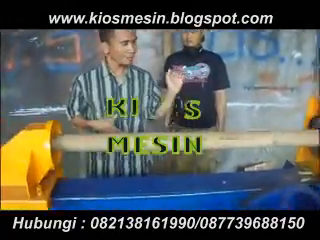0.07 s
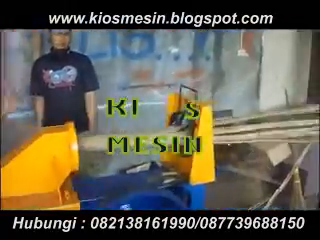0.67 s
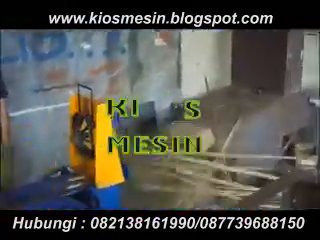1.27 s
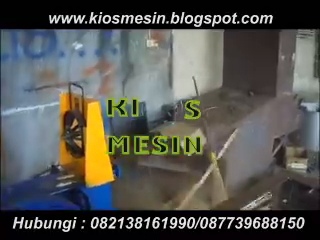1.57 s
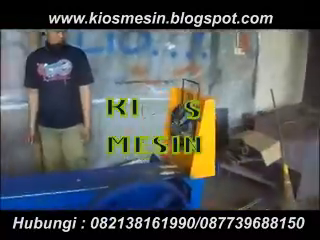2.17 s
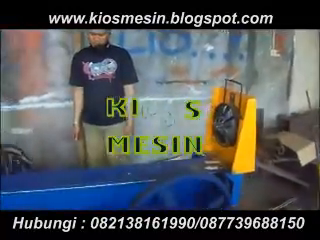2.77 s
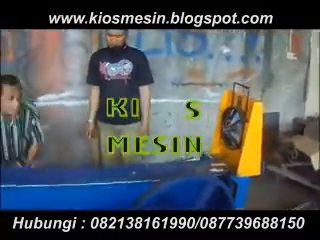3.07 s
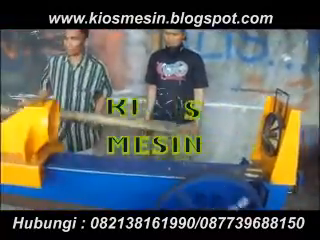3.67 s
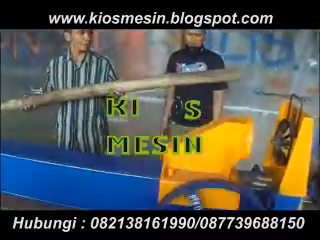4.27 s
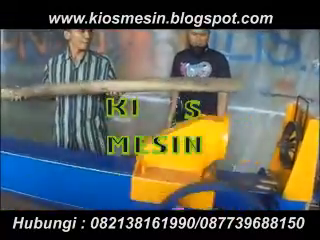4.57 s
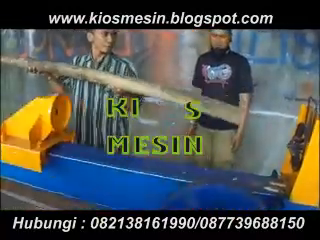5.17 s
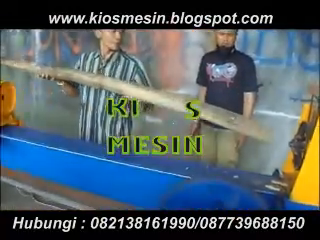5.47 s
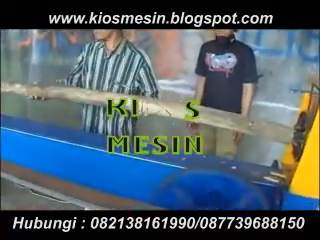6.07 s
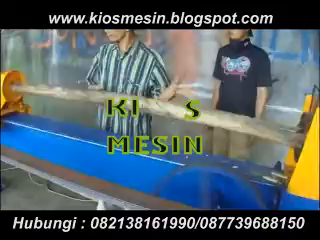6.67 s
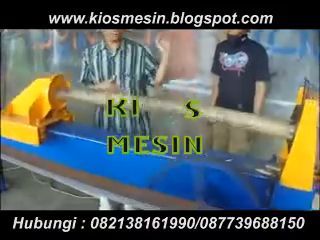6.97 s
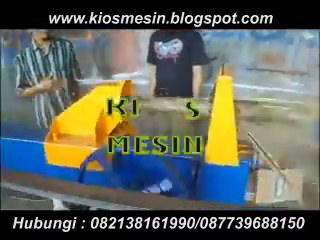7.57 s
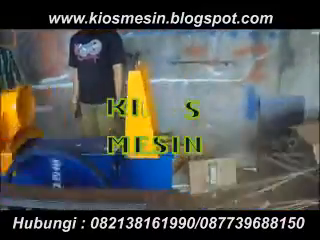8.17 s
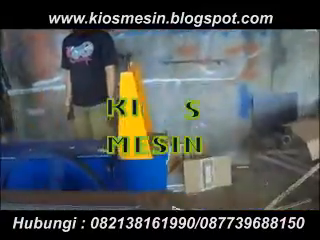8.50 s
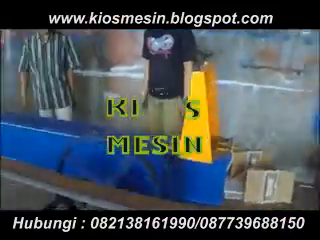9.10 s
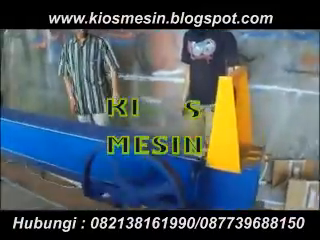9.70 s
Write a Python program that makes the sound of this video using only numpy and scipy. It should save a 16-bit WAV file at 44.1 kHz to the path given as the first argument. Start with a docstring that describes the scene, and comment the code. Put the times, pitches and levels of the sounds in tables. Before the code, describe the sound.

Sharp bamboo cracks with a short hollow ring open the scene, followed by tearing fibres and tumbling strips. The splitting machine's chain rattle and steel drone swell over a faint motor hum, and its howling, squeaking carriage slams three times. Then another pole splits with more cracks and clatter, and everything stops abruptly. Hard workshop walls give the cracks a short reverb, and the narrow-band mono microphone distorts slightly on the peaks.

```python
"""In a workshop a bamboo splitter runs: poles are driven through the star blade with sharp cracks and a
hollow ring, fibres tear and the strips clatter to the floor. The ram carriage crashes at the ends of its
travel; its rollers set the bed howling, dry steel squeaks and the rails whine. A drive chain rattles along
the droning steel frame over a motor's hum. The loudest blows overload a narrow-band microphone."""
import sys
import numpy as np
from scipy import signal
from scipy.fft import rfft, irfft, next_fast_len
from scipy.io import wavfile
from scipy.ndimage import uniform_filter1d, map_coordinates

SR = 44100
rng = np.random.default_rng(int(sys.argv[2]) if len(sys.argv) > 2 else 0)


def generate_wav(sig):
    """Save sig (samples, or channels by samples) to the path in sys.argv[1] as 16-bit PCM at SR."""
    pcm = np.round(np.clip(np.atleast_2d(sig).T, -1, 1) * 32767).astype(np.int16)
    wavfile.write(sys.argv[1], SR, pcm)


N = 433944
TIME = np.arange(N) / SR

# hard blows on the pole: t/s, level/dB, t60/s, second snap after/s, tube f/Hz, ring/dB, thump/dB
BLOWS = [(0.252, -21.5, 0.04, 0.0071, 596, -19, -42), (0.352, -5, 0.09, 0.019, 435, -15.5, -11.5),
         (0.7389, -7, 0.16, 0.021, 1370, -14, -33), (1.0789, -6, 0.046, 0.0256, 1123, -7.5, -37),
         (6.6565, -7, 0.076, 0.012, 533, -13, -41), (6.9527, -7, 0.054, 0.017, 910, -12.5, -30.5),
         (7.609, -9, 0.096, 0.016, 1275, -23, -51), (7.893, -12, 0.031, 0.01, 1083, -15, -42)]
# carriage slams: t/s, level/dB, rise/s, hold/s, clash level/dB, clash hold/s
CRASHES = [(2.807, -4.5, 0.03, 0.083, -11, 0.06), (4.496, -3.5, 0.007, 0.082, -7, 0.03),
           (6.185, -5.5, 0.007, 0.077, -10, 0.055)]
# resonances of the frame's panels: f/Hz, width/Hz, level/dB
PANELS = [(297.5, 16, 1.5), (349.4, 21, 2.5), (481, 37, 1), (573, 43, 4), (659.4, 24, 7), (754, 22, -1.5),
          (883.6, 32, 2), (1066, 20, 3), (1346, 57, -3), (1753, 33, -2.5), (2197, 28, -5.5),
          (2565, 12, 0.5), (2816, 20, -5.5)]
# spectrum of rattling steel: f/Hz, level/dB
RATTLE = [(700, -26), (1400, 2.5), (2000, -2.5), (3100, -0.5), (4000, -6), (4900, -11), (5400, -18),
          (6300, -22.5), (7500, -37), (9000, -57)]


def amp(db):
    """Decibels to gain."""
    return 10 ** (np.asarray(db) / 20)


def unit(x):
    """Scale to rms 1."""
    return x / np.sqrt(np.mean(x ** 2) + 1e-20)


def along(points, hz):
    """Read (f/Hz, value) points on a log frequency axis."""
    f, values = np.transpose(points)
    return np.interp(np.log(hz + 1), np.log(f), values)


def wobble(rate):
    """A smooth random curve, rate knots a second."""
    return map_coordinates(rng.standard_normal(int(N * rate / SR) + 4), [TIME * rate])


def filtered(x, response):
    """EQ x with a gain that is a function of frequency."""
    size = next_fast_len(len(x) + SR // 4)
    return irfft(rfft(x, size) * response(np.fft.rfftfreq(size, 1 / SR)), size)[:len(x)]


def coloured(x, spectrum, tilt_db=0):
    """Shape x with a spectrum, tilted by tilt_db per octave, at rms 1."""
    return unit(filtered(x, lambda f: amp(along(spectrum, f) + tilt_db * np.log2(np.clip(f, 300, 6000)))))


def ringing(x, modes):
    """Play x through (f/Hz, width/Hz, level/dB) resonances of alternating polarity, at rms 1."""
    def response(f):
        return sum((-1) ** k * amp(db) * 1j * f * width / (hz * hz - f * f + 1j * f * width)
                   for k, (hz, width, db) in enumerate(modes))
    return unit(filtered(x, response))


def impacts(rate, spread_db, t60):
    """Random contacts of uneven size, rate a second, each a tiny noise burst that dies in t60."""
    power = (rng.random(N) < rate / SR) * amp(spread_db * rng.random(N)) ** 2
    energy = signal.lfilter([1], [1, -amp(-60 / (t60 * SR)) ** 2], power)
    return unit(np.sqrt(energy) * rng.standard_normal(N))


def bursts(rows, t60):
    """Envelope of bursts that rise, hold and die away; the hold counts from the onset."""
    return sum(amp(db - 60 * np.maximum(TIME - s - hold, 0) / t60) * np.clip((TIME - s) / rise, 0, 1)
               for s, db, rise, hold in rows)


def swells(rows, idle_db, t60):
    """Envelope that builds over each stroke and sinks back to idling."""
    strokes = [amp(db - 60 * np.maximum(TIME - s - length, 0) / t60)
               * np.clip((TIME - s) / length, 0, 1) ** build for s, length, db, build in rows]
    return np.sqrt(amp(idle_db) ** 2 + np.sum(np.square(strokes), axis=0))


def cracks(snap_db=-7, snap_t60=0.017, second_db=-7, second_t60=0.13):
    """Each break is a hard snap with a short splintering tail; a hard blow breaks twice."""
    # spectrum of a struck pole: f/Hz, level/dB
    cane = [(60, -28.5), (220, -8.5), (400, -0.5), (700, -8), (1100, 4), (1700, 0), (2500, -2.5),
            (3800, -5.5), (5200, -12), (6500, -29), (8000, -42.5)]
    # loose splinters snap and tick, and a sound already dying away as it begins: t/s, level/dB, tilt/(dB per
    # octave), t60/s
    splinters = [(0.001, -11.5, 0, 0.24), (0.382, -9.5, 13.5, 0.024), (0.716, -21, 9, 0.086),
                 (1.569, -19.5, 4, 0.054), (1.6237, -20, 5.5, 0.11), (2.037, -14.5, 9, 0.025),
                 (3.3947, -19.5, -4, 0.035), (6.9104, -16.5, 2.5, 0.044), (6.9325, -21.5, 9, 0.034),
                 (7.135, -23, 0.5, 0.27), (7.257, -20, 4, 0.032), (7.4253, -15.5, 1, 0.038),
                 (7.5705, -18, 4.5, 0.04), (7.7807, -12, 5, 0.013), (8.245, -20, -5.5, 0.028),
                 (8.268, -22, 3, 0.029), (8.508, -18.5, 9, 0.19)]
    out, t = np.zeros(N), np.arange(SR // 3) / SR
    first = [(s, db, 0, t60) for s, db, t60, *_ in BLOWS]
    second = [(s + after, db + second_db, 0, second_t60) for s, db, _, after, *_ in BLOWS]
    for s, db, tilt_db, t60 in first + second + splinters:
        envelope = amp(db) * (amp(-60 * t / t60) + amp(snap_db - 60 * t / snap_t60))
        out[round(s * SR):][:len(t)] += envelope * coloured(rng.standard_normal(len(t)), cane, tilt_db)
    return out


def tube_ring():
    """The hollow cane rings briefly, at the pitch of the piece struck."""
    # modes of the tube: multiple of its pitch, level/dB, t60/s
    modes = [(1, 1.5, 0.086), (1.4, -2.5, 0.064), (1.85, -6.5, 0.06)]
    out, t = np.zeros(N), np.arange(SR // 3) / SR
    for s, *_, hz, ring_db, _ in BLOWS:
        for multiple, db, t60 in modes:
            envelope = amp(ring_db + db - 60 * t / t60)
            out[round(s * SR):][:len(t)] += envelope * np.sin(2 * np.pi * hz * multiple * t)
    return out


def thumps(centre_hz=80, t60=0.046):
    """Each hard blow jolts the frame: a low, dry thump at a random pitch."""
    out, t = np.zeros(N), np.arange(SR // 4) / SR
    for s, *_, db in BLOWS:
        hz = centre_hz * amp(rng.normal(0, 3.7))
        out[round(s * SR):][:len(t)] += amp(db - 60 * t / t60) * np.sin(2 * np.pi * hz * t)
    return out


def tearing():
    """Fibres crackle as they tear and scrape along the blade."""
    # tears: t/s, level/dB, rise/s, hold/s
    tears = [(0.39, -32.5, 0.01, 0.11), (0.745, -18, 0.005, 0.013), (1.33, -31.5, 0.014, 0.05),
             (1.56, -26, 0.014, 0.13), (3.385, -32, 0.008, 0.027), (6.8, -29.5, 0.06, 0.2),
             (7.255, -19.5, 0.03, 0.061), (7.43, -24.5, 0.022, 0.14), (7.615, -18.5, 0.005, 0.02),
             (7.895, -21, 0.006, 0.048), (8.47, -25.5, 0.016, 0.036)]
    # spectrum of snapping fibres: f/Hz, level/dB
    fibres = [(200, -14.5), (700, -0.5), (1400, 0.5), (3200, 2.5), (4500, -1), (5500, -11.5), (6500, -17),
              (8000, -35.5)]
    return bursts(tears, t60=0.45) * coloured(impacts(rate=1000, spread_db=6, t60=0.016), fibres)


def falling_strips(ring_db=-7):
    """The freed strips tumble on each other and ring."""
    # pole and strips clatter down: t/s, level/dB, rise/s, hold/s
    falls = [(1.085, -18, 0.0062, 0.014), (1.13, -18.5, 0.015, 0.1), (6.665, -24, 0.0046, 0.17),
             (7.955, -12.5, 0.017, 0.031)]
    # spectrum of the heap: f/Hz, level/dB
    heap = [(25, -32), (60, -17.5), (120, -17.5), (220, -5), (600, 2.5), (1200, 0), (2000, -3.5),
            (3000, -2.5), (4500, -14.5), (6500, -29.5), (8000, -48.5)]
    # resonances of loose strips: f/Hz, width/Hz, level/dB
    modes = [(560, 56, 1.5), (1090, 50, -1.5), (1300, 77, -5)]
    clatter = coloured(impacts(rate=600, spread_db=4, t60=0.04), heap)
    ring = ringing(impacts(rate=600, spread_db=4, t60=0.04), modes)
    return bursts(falls, t60=0.58) * unit(clatter + amp(ring_db) * ring)


def crashes(panels_db=-4, lead_s=0.055, lead_db=-16, clash_slower=2.2, steel_t60=0.22):
    """The loose carriage rattles, then hammers the frame in a dense volley with a bright steel clash."""
    # spectrum of the slam: f/Hz, level/dB
    slam = [(25, -11), (60, -11.5), (130, -6.5), (200, -4), (330, -2.5), (650, 0.5), (1200, 0), (2000, -4),
            (3000, -4.5), (4500, -13), (6300, -30.5), (7500, -42.5), (9000, -83)]
    lead = bursts([(s - lead_s, db + lead_db, lead_s / 2, lead_s) for s, db, *_ in CRASHES], steel_t60)
    volley = bursts([row[:4] for row in CRASHES], t60=0.38)
    clash = bursts([(s, db, clash_slower * rise, hold) for s, _, rise, _, db, hold in CRASHES], steel_t60)
    hammering = coloured(impacts(rate=1000, spread_db=3, t60=0.035), slam)
    panels = ringing(impacts(rate=1000, spread_db=3, t60=0.035), PANELS)
    body = unit(hammering + amp(panels_db) * panels)
    steel = impacts(rate=600, spread_db=6.5, t60=0.012)
    return lead * coloured(steel, RATTLE) + volley * body + clash * coloured(steel, RATTLE, tilt_db=3)


def chain(panels_db=-4.5, uneven_db=0.38):
    """Links knock along the frame, whose panels drone, and chatter on the sprockets."""
    # the chain swells as it drags the carriage; a build under 1 swells early, over 1 late:
    # t/s, length/s, drone level/dB, rattle level/dB, drone build, rattle build
    strokes = [(0.8, 0.56, -31, -27.5, 0.5, 0.6), (1.75, 1.24, -19.5, -28.5, 0.36, 0.14),
               (3.097, 1.303, -17.5, -20.5, 1.6, 1.1), (4.908, 1.275, -17, -23.5, 0.62, 0.33),
               (7.15, 0.98, -28, -29, 0.36, 0.66), (8.26, 0.55, -23.5, -26, 0.92, 0.44)]
    # spectrum of the droning frame: f/Hz, level/dB
    frame = [(18, -60.5), (30, -33), (92, -11.5), (124, -18), (287, -2.5), (402, -7.5), (475, -1.5),
             (584, -4.5), (641, -3.5), (787, -1.5), (1430, -6.5), (2080, -11), (2600, -14.5), (3380, -41.5),
             (5720, -120)]
    drone_rows = [(s, length, db, build) for s, length, db, _, build, _ in strokes]
    rattle_rows = [(s, length, db, build) for s, length, _, db, _, build in strokes]
    links = coloured(impacts(rate=900, spread_db=3, t60=0.06), frame)
    panels = ringing(impacts(rate=900, spread_db=3, t60=0.06), PANELS)
    chatter = coloured(impacts(rate=900, spread_db=4, t60=0.05), RATTLE)
    drone = swells(drone_rows, idle_db=-28, t60=2.5) * unit(links + amp(panels_db) * panels)
    rattle = swells(rattle_rows, idle_db=-31, t60=2.4) * chatter
    return amp(uneven_db * wobble(rate=7)) * (drone + rattle)


def rollers():
    """The rolling carriage makes the bed howl; after the second slam a lower resonance takes over."""
    # howls: t/s, level/dB, rise/s, hold/s
    howls = [(2.3, -20, 0.32, 0.45), (3.4, -34.5, 0.23, 0.86), (5.05, -25, 0.2, 0.81),
             (6.62, -27.5, 0.18, 0.18)]
    # resonances of the bed: f/Hz, width/Hz, early level/dB, late level/dB
    bed = [(466, 31, -23.5, 1), (543, 36, -6, -3), (643.4, 31, 4, 0.5)]
    rumble = impacts(rate=600, spread_db=2, t60=0.04)
    early = ringing(rumble, [(hz, width, db) for hz, width, db, _ in bed])
    late = ringing(rumble, [(hz, width, db) for hz, width, _, db in bed])
    return bursts(howls, t60=1.5) * np.where(TIME < CRASHES[1][0], early, late)


def groan():
    """The knocking links shake the frame's long beams when the drive pulls hardest."""
    # groans: t/s, level/dB, rise/s, hold/s
    groans = [(0.8, -30.5, 0.18, 0.4), (4.0, -25, 0.35, 0.48), (7.15, -29.5, 0.23, 1)]
    # resonances of the beams: f/Hz, width/Hz, level/dB
    beams = [(263.4, 48, -2), (302, 25, -1.5), (365, 28, -0.5)]
    return bursts(groans, t60=2.3) * ringing(impacts(rate=300, spread_db=2, t60=0.043), beams)


def squeaks(waver=0.022):
    """Dry steel sings briefly on a rough, wavering pitch."""
    # squeaks and chinks: t/s, f/Hz, level/dB, length/s
    chirps = [(3.166, 2520, -28.5, 0.058), (3.375, 2510, -25.5, 0.045), (4.151, 1776, -33, .08),
              (5.037, 2663, -31.5, 0.055), (5.289, 2680, -24.5, 0.051), (6.561, 2510, -26, 0.047),
              (6.844, 1756, -27, 0.098), (8.488, 2360, -29, 0.081), (8.539, 3065, -26.5, 0.05),
              (8.659, 3090, -28, .11)]
    out = np.zeros(N)
    for s, hz, db, length in chirps:
        swell = signal.windows.tukey(round(length * SR), 0.8)
        jitter = unit(uniform_filter1d(rng.standard_normal(len(swell)), size=100))
        phase = 2 * np.pi * np.cumsum(hz * (1 + waver * jitter)) / SR
        out[round(s * SR):][:len(swell)] += amp(db) * swell * np.sqrt(2) * np.sin(phase)
    return out


def rails():
    """The carriage scrapes along its rails on the empty forward stroke; friction sings a thin whine."""
    # the scrape: t/s, level/dB, rise/s, hold/s
    scrape = [(3.05, -33, 0.51, 1)]
    # resonances of the whine: f/Hz, width/Hz, level/dB
    whine = [(3358, 120, 1), (3840, 60, -7)]
    return bursts(scrape, t60=4.2) * ringing(rng.standard_normal(N), whine)


def motor(flutter_db=0.71, drift_rad=0.63):
    """Motor and belt hum, slightly unsteady in level and phase."""
    # hum lines: f/Hz, rms level/dB
    lines = [(102.3, -59.5), (155, -50.5), (301.5, -48.5)]
    return sum(amp(db + flutter_db * wobble(rate=3)) * np.sqrt(2)
               * np.sin(2 * np.pi * hz * TIME + drift_rad * wobble(rate=5)) for hz, db in lines)


def workshop(x, build_s=0.015):
    """The hard walls answer with a short reverb in which the bass lingers."""
    # decay of the room: f/Hz, t60/s
    decay = [(150, 1), (1000, 0.26), (3000, 0.28), (7000, 0.31)]
    hz, t, noise = signal.stft(rng.standard_normal(SR * 2 // 3), SR, nperseg=256)
    tail = signal.istft(noise * amp(-60 * t / along(decay, hz)[:, None]), SR, nperseg=256)[1]
    tail *= 1 - np.exp(-np.arange(len(tail)) / SR / build_s)
    return signal.fftconvolve(x, tail / np.linalg.norm(tail))[:N]


def scene(reverb_db=-7.5):
    """Bamboo and machine in mono; only the cracks and the tube's ring feed the reverb."""
    breaks = cracks() + tube_ring()
    bamboo = breaks + thumps() + tearing() + falling_strips()
    machine = crashes() + chain() + rollers() + groan() + squeaks() + rails() + motor()
    return (bamboo + machine + amp(reverb_db) * workshop(breaks))[None]


def record(dry, dip_hz=5500, dip_db=-2, ceiling=1.004, stop_s=8.885, band_hz=7000,
           grit_db=-36, top_hz=15600):
    """A narrow-band microphone with a treble dip overloads; faint grit rides on it until it cuts off."""
    dipped = filtered(dry[0], lambda hz: amp(dip_db / (1 + ((hz - dip_hz) / 400) ** 4)))
    saturated = dipped / (1 + np.abs(dipped / ceiling) ** 6) ** (1 / 6)
    narrow = filtered(saturated * (TIME < stop_s), lambda hz: 1 / np.sqrt(1 + (hz / band_hz) ** 60))
    grit = amp(grit_db) * np.gradient(narrow) * rng.standard_normal(N)  # strongest on steep slopes
    return filtered(np.clip(narrow + grit, -1, 1), lambda hz: hz < top_hz)[None]


dry = scene()
out = record(dry)
generate_wav(out)
```